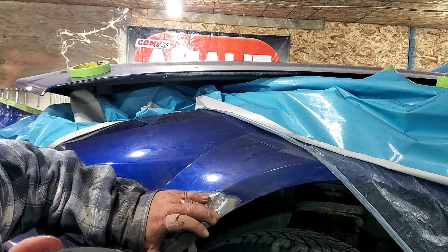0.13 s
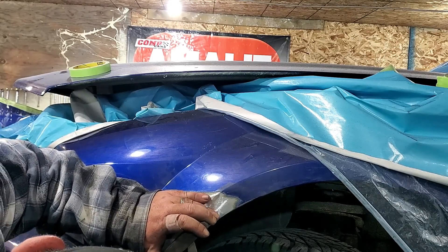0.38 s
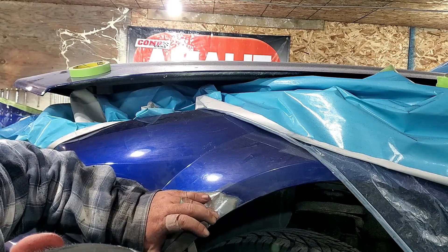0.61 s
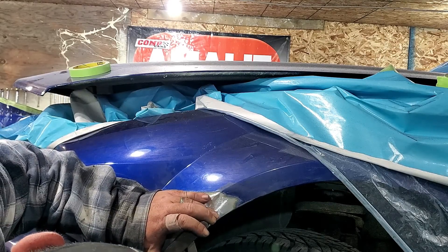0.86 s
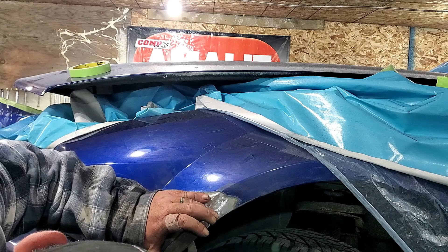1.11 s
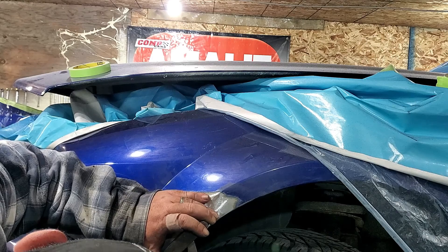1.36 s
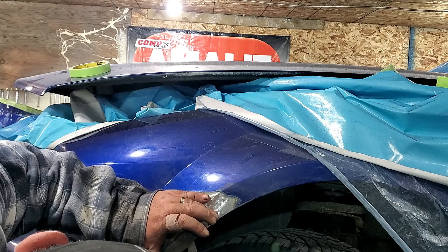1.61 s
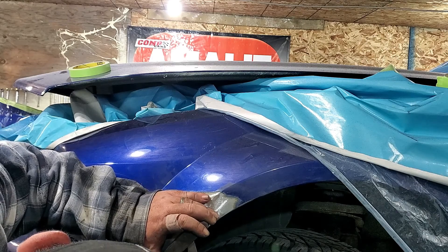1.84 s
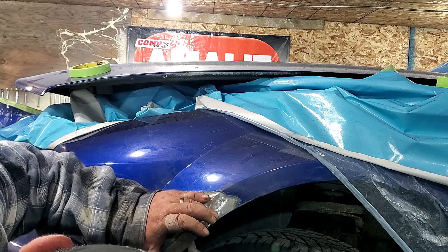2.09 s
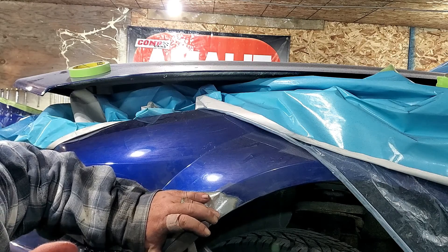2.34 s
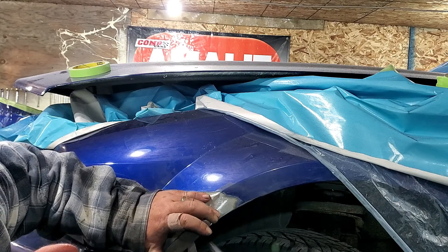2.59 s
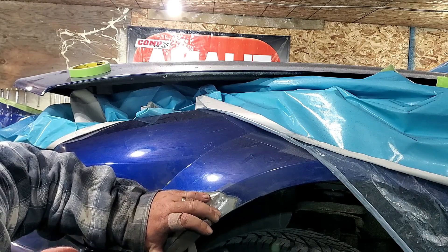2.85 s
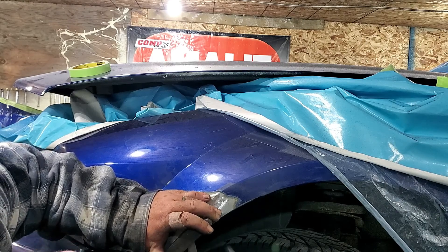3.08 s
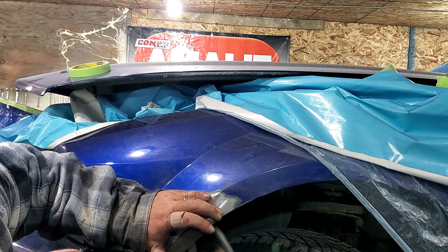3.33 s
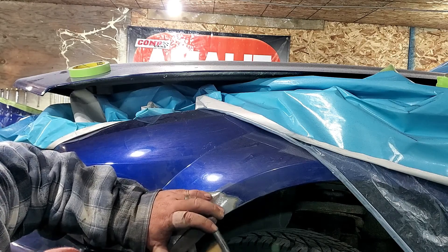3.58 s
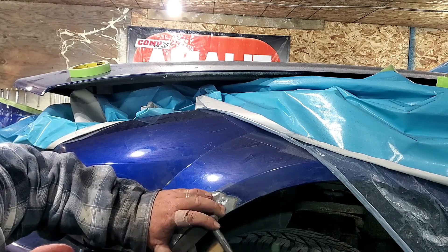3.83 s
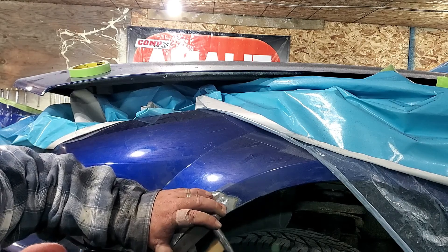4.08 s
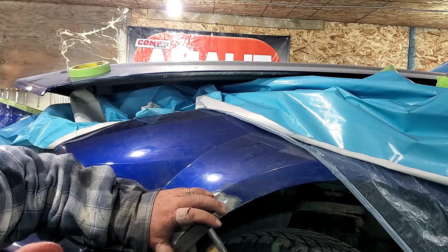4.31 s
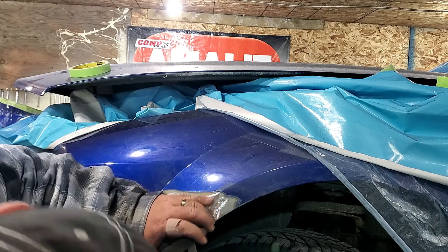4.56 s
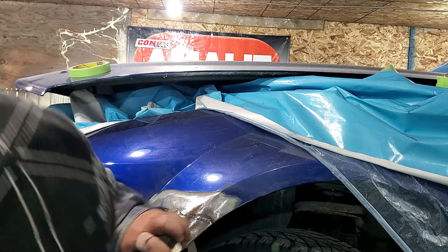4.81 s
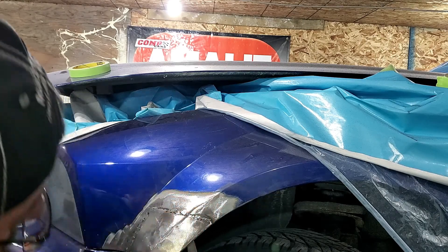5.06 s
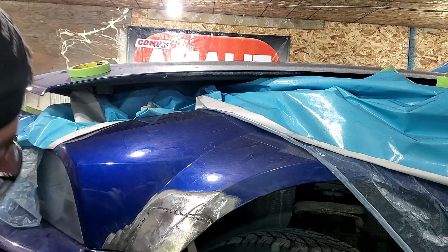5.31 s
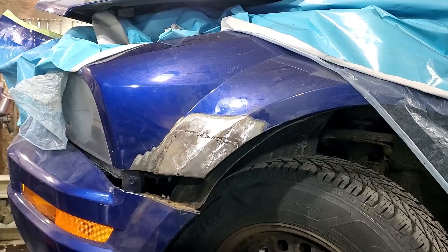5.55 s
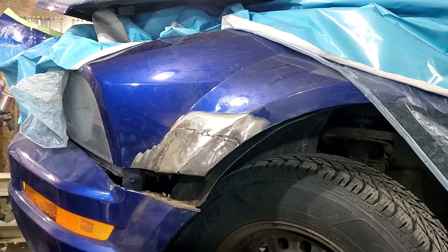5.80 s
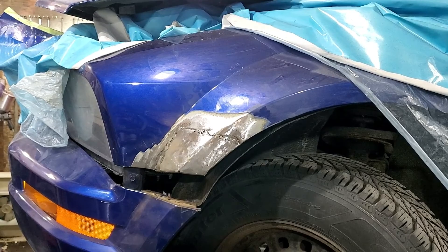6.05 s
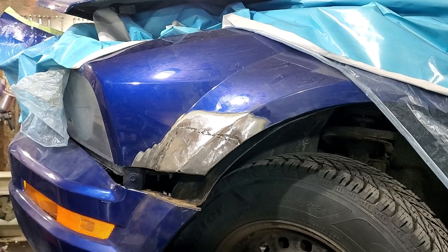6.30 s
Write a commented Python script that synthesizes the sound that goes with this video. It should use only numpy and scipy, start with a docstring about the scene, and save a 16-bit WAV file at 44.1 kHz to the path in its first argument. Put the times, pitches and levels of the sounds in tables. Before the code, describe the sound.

From 0 to about 4.4 seconds a hammer taps a steel car fender in a wooden garage, roughly four blows a second. The tail of an earlier blow opens the scene; hits land from 0.15 s, slightly uneven in strength and colour, with a much softer one at 3.64 s and the last at 4.34 s. Each is a sharp tick and solid clank around 300 to 1300 hertz, hand-damped, with low car-body boom, brief rattling tail and a very faint high ring from the hammer head. At 4.44 to 4.9 s the tool slides off in an uneven, gritty scrape with a faint squeal. Soft sleeve rustles and tiny dry fabric snaps follow until 5.3 s over quiet air and faint hum. At 5.4 s a cut brings low, wavering shop rumble, with a soft rush swelling at the very end. Close stereo camera microphones compress the blows.

```python
"""A hammer taps four times a second on a hand-damped steel fender in a wooden garage: the sheet, the car
body and the hammer head ring, over shop air and a faint hum. The blows stop and the tool slides off the panel
as filtered grains and grit; a sleeve rustles close by as shaped noise. A splice jumps to the quiet shop:
a low rumble, then a soft rush swells. Two spaced camera microphones ride their gain down on loud blows."""
import sys
import numpy as np
from scipy import signal
from scipy.fft import rfft, irfft
from scipy.io import wavfile
from scipy.ndimage import uniform_filter1d

SR = 44100
rng = np.random.default_rng(int(sys.argv[2]) if len(sys.argv) > 2 else 0)


def output_pcm(signal):
    """Save a mono or channel-first signal as 16-bit PCM at the path in sys.argv[1].

    Samples are clipped to [-1, 1] before scaling.
    """
    pcm = np.clip(np.atleast_2d(signal).T, -1, 1) * 32767
    wavfile.write(sys.argv[1], SR, np.round(pcm).astype(np.int16))


def voltage_ratio(level):
    """Linear amplitude factor for a level in decibels (scalar or array-like)."""
    return 10 ** (np.asarray(level, float) / 20)


N = 283122
LEAD = 8192   # samples kept ahead of the start, for the blow that falls there
SPLICE_S = 5.404


def rms_one(x):
    """Scale to unit rms."""
    return x / np.sqrt(np.mean(x ** 2) + 1e-20)


def at_hz(points, hz):
    """Read a table on a log-frequency axis."""
    points = np.array(points)
    return np.interp(np.log(hz), np.log(points[:, 0] + 1), points[:, 1])


def bands(shape, low_hz=25, high_hz=17000):
    """Third-octave bands of noise; neighbours are unrelated."""
    white = rng.standard_normal((2, *shape))
    edges = 25 * 2 ** np.arange(0, 9.7, 1 / 3)
    for k, (low, high) in enumerate(zip(edges, edges[1:])):
        if low_hz <= high and low <= high_hz:
            band = signal.butter(2, [low, high], "band", fs=SR, output="sos")
            yield np.sqrt(low * high), signal.sosfilt(band, white[k % 2])


# Likeness of the two spaced microphones: pitch_hz, left_right_correlation
LIKENESS = [(60, 0.96), (290, 0.93), (640, .6), (1400, 0.0024), (3000, -0.0041)]


def pair(hz, mid, side):
    """Two spaced microphones hear the bass alike and the treble apart."""
    alike = np.clip(at_hz(LIKENESS, hz), -1, 1)
    return np.sqrt(1 + alike) * mid + np.sqrt(1 - alike) * side * [[1], [-1]]


def noise(spectrum, start_s=0):
    """Steady stereo noise from a given moment on, rms 1 while it lasts."""
    first = int(start_s * SR)
    out = 0
    for hz, (mid, side) in bands((2, N - first), spectrum[0][0], spectrum[-1][0]):
        out = out + voltage_ratio(at_hz(spectrum, hz)) * pair(hz, mid, side)
    return np.pad(rms_one(out), ((0, 0), (first, 0)))


def waver(hz, width_hz):
    """A narrow band of noise around a pitch, which may move; rms 1."""
    lowpass = signal.butter(2, width_hz / 2, fs=SR, output="sos")
    slow = signal.sosfilt(lowpass, rng.standard_normal((2, N)))
    phase = 2 * np.pi * np.cumsum(hz + np.zeros(N)) / SR
    return rms_one(slow[0] * np.sin(phase) + slow[1] * np.cos(phase))


def flicker(rate_hz, depth_db):
    """Uneven gain of a chattering or slipping contact: slow noise in decibels, rms 1."""
    r = np.exp(-2 * np.pi * rate_hz / SR)
    slow = signal.lfilter([1], [1, -2 * r, r * r], rng.standard_normal(N))
    return rms_one(voltage_ratio(depth_db * rms_one(slow)))


def ringing(modes, gains, t, rise_cycles=1e-3):
    """Dying sines, one row per row of gains; each builds up over some cycles."""
    hz, db, t60 = np.transpose(modes)[:, :, None]
    rise = 1 - np.exp(-t * hz / rise_cycles)
    return gains @ (voltage_ratio(db - 60 * t / t60) * np.sin(2 * np.pi * hz * t) * rise)


def struck_anew(modes, gains, t, rise_cycles):
    """Each mode is a cluster of close partials, shifted and weighted anew at every blow."""
    cluster, detune_per_khz, spread_db = 3, 0.022, 2.5
    hz, db, t60 = np.repeat(modes, cluster, axis=0).T
    gains = np.repeat(gains, cluster, axis=1) / np.sqrt(cluster)
    spread = detune_per_khz * np.minimum(hz / 1000, 1)   # wider for high modes, up to 1 kHz
    rows = []
    for gain, (shift, weight) in zip(gains, rng.standard_normal((len(gains), 2, len(hz)))):
        partials = np.transpose([hz * (1 + spread * shift), db + spread_db * np.tanh(weight), t60])
        sign = np.repeat(np.sign(shift[::cluster]), cluster)
        rows.append(ringing(partials, gain * sign, t, rise_cycles))
    return np.array(rows)


# Blows on the fender: start_s, strength_db, bass_db, thump_db (near 300 Hz), clank_db (near 1.3 kHz),
# edge_db (near 3.3 kHz), sizzle_db, head_ring_db, hand_damping_db_per_s
BLOWS = [(-.1035, -10.5, 10.5, 6.5, 9, 7, 3, -50.5, 24), (0.1555, 4, 2.5, 1, 4, 3.5, 0, -61.5, 29.5),
         (0.4154, 6, 1.5, 0, 3, 1.5, 0, -77, 31.5), (0.6768, 7, -1, -1, 1.5, 0.5, 1.5, -69, 20),
         (0.9377, 3, 7.5, 3.5, 6, 4.5, 6, -73.5, 52.5), (1.1894, 11, -2.5, -1, 2.5, 0.5, 0.5, -55.5, 26),
         (1.4377, 8.5, -1.5, -3, 5, 2, 1.5, -56, 33), (1.6833, 7.5, -2, -5, 2, 3, 0, -59, 28),
         (1.9366, 7.5, -3, -3.5, 1.5, 1, -0.5, -69, 32.5), (2.183, 6.5, 0, 4, 1.5, -2.5, -1, -67.5, 77),
         (2.4256, 6.5, -2.5, -3, -1.5, -5, 0, -46.5, 36), (2.6773, 5.5, -5, -7, 3, -0.5, 1, -51, 18.5),
         (2.9427, 7.5, -6, -4.5, 2.5, 1.5, 0.5, -48.5, 19.5),
         (3.1978, 7, -2.5, -4.5, 2.5, 0.5, 0.5, -49.5, 27), (3.4241, 6.5, -5, -1.5, 4, 1, -0.5, -60, 21),
         (3.6412, -7.5, 6.5, 7, 10, 4, 10.5, -62, 49), (3.873, 4, -0.5, 1, 7, 1, 1, -65, 41),
         (4.108, 7, -4, 1, 7, 7, -4.5, -59, 30.5), (4.3397, 4, -3.5, -3, 2, 1.5, -1, -54, 29.5)]
# Where the colours of a blow sit: pitch_hz of bass, thump, knock, clank, edge, sizzle
COLOUR_HZ = [190, 300, 550, 1300, 3300, 11000]
# Modes of the fender sheet: pitch_hz, level_db, t60_s
FENDER = [(225.2, -1, 0.37), (295.1, 3.5, 0.3), (324, -6, 0.13), (370.2, 0, 0.34), (441, -0.5, 0.37),
          (500, -2, 0.24), (555.4, -2, 0.45), (630.5, -1, 0.28), (767, -5.5, 0.37), (804, -5, 0.33),
          (983, -6, 0.41), (1070, -4.5, 0.29), (1116, -9, 0.37), (1290, -4, 0.2), (1583, -8, 0.25),
          (1760, -8, 0.27), (3260, -11.5, 0.21)]
# Boom of the car body: pitch_hz, level_db, t60_s
SHELL = [(47.9, -7, 0.44), (78.6, 1, 0.33), (90.3, 1, 0.35), (95.9, 11.5, 0.17), (115.45, 3, 0.37),
         (156.3, 7.5, 0.25)]
# Crack of the dense sheet modes: pitch_hz, level_db (per Hz)
CLATTER = [(88, -35), (150, -4.5), (287, 0), (401, 1.5), (618, -3.5), (709, -8.5), (2220, -16), (3290, -18),
           (4870, -25.5), (9330, -31), (15500, -25), (16500, -43)]
# Decay of the crack: pitch_hz, t60_s
CLATTER_T60 = [(200, 0.039), (1000, 0.039), (5000, 0.01), (14000, 0.024)]
# Decay of rattle and reverberation: pitch_hz, t60_s
TAIL_T60 = [(150, 0.29), (300, 0.26), (1000, 0.33), (3000, 0.28), (8000, 0.23), (14000, 0.2)]


def hammer():
    """Each blow pushes the sheet, rings its modes, cracks, booms the body and leaves a diffuse tail."""
    blows = np.array(BLOWS)
    t = np.arange(SR // 2) / SR
    bass, thump, clank, edge, sizzle = blows[:, 2:7].T
    shade = np.transpose([bass, thump, 0 * bass, clank, edge, sizzle])   # the knock follows strength alone

    def colour(hz):
        """Where the blow lands sets its colour: gains, blows x frequencies."""
        return voltage_ratio([np.interp(np.log(hz), np.log(COLOUR_HZ), row) for row in shade])

    grip_db = blows[:, 8:] * t
    sheet = struck_anew(FENDER, colour(np.array(FENDER)[:, 0]), t, rise_cycles=4.4)
    sheet = voltage_ratio(-17.0 - grip_db - 280 * t ** 2) * sheet   # the hand damps the ring ever more

    late = np.maximum(t - 0.00079, 0)   # the sheet gives way just after the first tick
    push_modes = [(319, 17.3, 0.0075), (564.4, 25.7, 0.0055), (880, 14.6, 0.0059), (1344, 5.9, .007)]
    push = ringing(push_modes, colour(np.array([297.2, 475.0, 850, 1300])), late)
    push = push * (1 - np.exp(-(late / 0.0026) ** 2))
    push[:, 146:] += voltage_ratio(-6.0) * push[:, :-146]   # first reflection, 3.3 ms late

    boom = voltage_ratio(-27.0) * ringing(SHELL, colour(np.array(SHELL)[:, 0]), t)
    boom = boom * (1 - np.exp(-(t / 0.019) ** 2))   # builds up slowly

    crack, tail = 0, 0
    long = t[:int(.36 * SR)]
    for hz, (mid, side) in bands((2, len(blows), len(long)), 130):
        gain = voltage_ratio(at_hz(CLATTER, hz)) * colour(hz)[:, None]
        clatter = voltage_ratio(-60 * long / at_hz(CLATTER_T60, hz))
        tick = voltage_ratio(4.4 * np.log2(hz / 9000) - 1 - 60 * long / 0.0049)   # brief and bright
        crack = crack + gain * (clatter + tick) * mid
        # countless sheet modes and reflections: never the same for two blows
        decay = voltage_ratio(-60 * long / at_hz(TAIL_T60, hz)) * (1 - np.exp(-long / (0.0084 + 3.6 / hz)))
        # the noise runs backwards here, so the tail does not copy the crack
        tail = tail + gain[:, None] * decay * pair(hz, mid[:, None, ::-1], side[:, None])

    direct = sheet + push
    direct[:, :len(long)] += voltage_ratio(13.0) * crack * (1 - np.exp(-long / 0.0011))
    thin = signal.butter(2, 170.0, "high", fs=SR, output="sos")   # a thin sheet radiates little bass
    direct = signal.sosfilt(thin, direct) + boom
    # the loose patch chatters in the tail
    starts = rng.integers(0, N - len(long), len(blows))
    chatter = flicker(119.3, depth_db=1.5)[starts[:, None] + np.arange(len(long))]
    tail = (voltage_ratio(11.5 - grip_db[:, :len(long)]) * chatter)[:, None] * tail

    out = np.zeros((3, LEAD + N + len(t)))   # direct sound, then left and right tail
    for row, near, diffuse in zip(blows, direct, tail):
        i = LEAD + round(row[0] * SR)
        out[0, i:i + len(t)] += voltage_ratio(row[1]) * near
        out[1:, i:i + len(long)] += voltage_ratio(row[1]) * diffuse
    return out[0, :LEAD + N], out[1:, LEAD:LEAD + N]


# Decay of the wooden garage: pitch_hz, t60_s
ROOM_T60 = [(60, 0.37), (300, 0.22), (1000, 0.22), (3000, 0.29), (8000, 0.18), (14000, 0.16)]


def garage(x):
    """Direct sound, a little late on the left, and one fixed diffuse tail that dies band by band."""
    t = np.arange(int(.6 * SR)) / SR
    tail = 0
    for hz, (mid, side) in bands((2, len(t))):
        tail = tail + pair(hz, mid, side) * voltage_ratio(-60 * t / at_hz(ROOM_T60, hz))
    echo = voltage_ratio(-35.0) * tail * (1 - np.exp(-t / 0.002))
    echo[0, 11] += 1   # left microphone, 11 samples late
    echo[1, 0] += 1
    return signal.fftconvolve(x[None], echo, axes=1)[:, :len(x)]


def hammer_head():
    """The hardened head sings on; each blow stops and restarts it, and laying the tool down damps it."""
    head_hz, t60_s, laid_s = 4500, 1.7, 4.7
    s, ring_db = np.array(BLOWS)[:, 0], np.array(BLOWS)[:, 7]
    t = np.arange(N) / SR
    k = np.searchsorted(s, t) - 1   # latest blow
    level_db = ring_db[k] - 60 * (t - s[k]) / t60_s - 60 * np.maximum(t - laid_s, 0)
    return voltage_ratio(level_db) * np.sin(2 * np.pi * head_hz * t - [[.8], [0]])


def after_splice():
    """Crossfade of 8 ms that ends at the splice: 0 before, 1 after."""
    return np.clip((np.arange(N) / SR - SPLICE_S) * 125 + 1, 0, 1)


# Shop air before the splice: pitch_hz, level_db (per Hz, relative)
AIR = [(18, -34.5), (45, 6), (85, 4.5), (404, -17), (476, -4), (527, -15), (1040, -14), (1150, -23.5),
       (4000, -31.5), (5200, -56)]


def shop_air():
    """Quiet air, steady coloured noise, until the splice."""
    return (1 - after_splice()) * voltage_ratio(-64) * noise(AIR)


# Faint wavering hum: start_s, pitch_hz, level_db
HUM = [(0, 490, -56), (5.39, 492.8, -77.5), (5.4, 517.5, -83), (6.2, 517, -69.5)]


def hum():
    """A faint tone, a narrow band of noise, that drifts in pitch and level."""
    s, hz, db = np.transpose(HUM)
    t = np.arange(N) / SR
    return voltage_ratio(np.interp(t, s, db)) * waver(np.interp(t, s, hz), width_hz=32)


# Tool dragged off, level in the panel: start_s, level_db
SLIDE = [(4.44, -25), (4.488, -43), (4.59, -38.5), (4.63, -33), (4.664, -27), (4.68, -45), (4.712, -31.5),
         (4.725, -55), (4.775, -44.5), (4.79, -58), (4.86, -63)]
# Colour of the grit: pitch_hz, level_db (per Hz, relative)
GRIT = [(410, -33), (700, -4), (1360, -4), (1610, -15), (1860, -5), (2960, -12.5), (15000, -31.5),
        (15900, -27), (16500, -58)]


def slide():
    """Dense uneven grains of steel on steel ring the damped sheet; the rest is grit with a faint squeal."""
    grit_start_s, lift_s = 4.44, 4.668   # the grit swells until the tool lifts
    grit_db, rise_db_per_s, grit_t60_s = -36, 31, 0.24
    time = np.arange(N) / SR
    s, db = np.transpose(SLIDE)
    s = np.r_[s[0] - .008, s, s[-1] + .008]   # fades in and out within 8 ms
    panel = np.interp(time, s, np.r_[0, voltage_ratio(db), 0])

    grains = rng.standard_normal(N) * voltage_ratio(2.7 * rng.exponential(1, N)) * flicker(43.0, depth_db=4.0)
    t = np.arange(SR // 8) / SR
    near = voltage_ratio(-26.0 * np.abs(np.log2(np.array(FENDER)[:, 0] / 490)))   # mostly the modes near 500 Hz
    damped = [(hz, db, 0.24 * t60) for hz, db, t60 in FENDER]
    body = ringing(damped, near, t) * (1 - np.exp(-t / 0.00047))
    body += voltage_ratio(-31.5) * ringing(SHELL, np.array(SHELL)[:, 0] / 100, t)   # the car body rumbles along
    scrape = panel * rms_one(signal.fftconvolve(grains, body)[:N])

    since = time - lift_s
    swell = voltage_ratio(grit_db + np.minimum(rise_db_per_s * since, -60 * since / grit_t60_s))
    swell = swell * (since > grit_start_s - lift_s)
    squeal = voltage_ratio(-10.5) * waver(1650, width_hz=50)
    grit = swell * flicker(35.0, depth_db=1.5) * (noise(GRIT, start_s=4.4) + squeal)
    return scrape, grit


# Colour of the crisp cloth: pitch_hz, level_db (per Hz, relative)
RUSTLE_TONE = [(2350, -32), (4000, -7), (9850, -7), (14500, 0), (16200, -7), (16500, -33)]
# Fabric snaps: start_s, level_db
TICKS = [(4.959, -53), (4.976, -57), (5.246, -55), (5.295, -58)]
# Sleeve strokes, each peaking at its start_s: start_s, length_s, crisp_db, dull_db
BRUSHES = [(4.748, 0.11, -78, -59), (4.875, 0.069, -69.5, -69.5), (4.954, 0.04, -65, -66),
           (5.11, 0.028, -79, -78)]


def sleeve():
    """Cloth brushing close by: strokes that swell and fade over a faint rustle, with a few dry snaps."""
    t = np.arange(N) / SR
    s, length, crisp_db, dull_db = np.transpose(BRUSHES)[:, :, None]
    stroke = np.exp(np.minimum((t - s) / (.3 * length), (s - t) / length))   # swells faster than it fades
    crisp = (voltage_ratio(crisp_db) * stroke).sum(axis=0) + voltage_ratio(-77) * (t < SPLICE_S)   # faint steady rustle
    dull = (voltage_ratio(dull_db) * stroke).sum(axis=0)
    snaps = np.zeros(N)
    for start_s, level_db in TICKS:
        snaps[round(start_s * SR)] = voltage_ratio(level_db)
    snaps = signal.lfilter([1], [1, -np.exp(-1 / (0.0015 * SR))], snaps)   # die over 1.5 ms
    dull_tone = [(700, -7.0), (1200, 1.0), (4500, -12.0), (6000, -35)]
    return (crisp + snaps) * noise(RUSTLE_TONE, start_s=4.6) + dull * noise(dull_tone, start_s=4.6)


# Shop after the splice: pitch_hz, level_db (per Hz, relative)
RUMBLE = [(15, -36), (25, -2), (59, 2.5), (99, -1.5), (130, -3), (166, -34), (206, -2), (285, -38),
          (363, -25.5), (405, -30), (531, -28), (695, -33), (988, -38), (2350, -49.5), (16000, -71)]
# Wavering tones in the rumble: pitch_hz, level_db (relative)
DRONE = [(60, -0.5), (128, -4), (205, -13.5)]


def shop_rumble():
    """After the splice a rumble with wavering tones, slowly rising air and a soft rush that swells last."""
    t = np.arange(N) / SR
    low = noise([p for p in RUMBLE if p[0] < 330] + [(400, -60)], start_s=5.4)
    low = voltage_ratio(-0.5) * low
    for hz, db in DRONE:
        low = low + voltage_ratio(db) * waver(hz, width_hz=16.0)
    air = noise([(280, -60)] + [p for p in RUMBLE if p[0] >= 330], start_s=5.3)
    air_gain = voltage_ratio(-70 + 3.5 * (t - SPLICE_S))   # dB per second
    rush = noise([(500, -18), (800, 1.0), (1700, -2), (3500, -32)], start_s=3.5)
    rush_gain = voltage_ratio(-80) + voltage_ratio(-64 + 85 * (t - 6.43))   # steady part, plus a swell in dB per second
    after = voltage_ratio(-53) * low + air_gain * air + rush_gain * rush
    after[1] = np.roll(after[1], 8)   # late on the right: these sounds come from the left
    return after_splice() * after


def scene():
    """Hammer and slide in the garage, sleeve close by, shop air around."""
    struck, tail = hammer()
    scrape, grit = slide()
    struck[LEAD:] += scrape
    in_garage = garage(struck)[:, LEAD:] + tail + hammer_head() + grit
    return in_garage + sleeve() + shop_air() + hum() + shop_rumble()


def low_pass(x):
    """Removes everything above the highest recorded frequency."""
    return signal.sosfilt(signal.butter(12, 16990, fs=SR, output="sos"), x)


# Microphone balance: pitch_hz, level_db (left minus right)
BALANCE_DB = [(60, 0), (700, .5), (2400, 0.5), (8000, -1), (15000, 4)]


def record(dry):
    """The camera's microphones differ by band; a compressor ducks loud blows and lets go over the tail."""
    hz = np.fft.rfftfreq(N, 1 / SR) + 1
    balance = voltage_ratio(at_hz(BALANCE_DB, hz) * np.array([[.5], [-.5]]))
    x = irfft(rfft(dry) * balance, N)
    x = signal.sosfilt(signal.ellip(10, .5, 55, 15750, fs=SR, output="sos"), x)   # treble cut
    x = x + voltage_ratio(-89.5) * rng.standard_normal(x.shape)   # microphone hiss

    level_db = 10 * np.log10(uniform_filter1d(np.mean(x ** 2, axis=0), size=128).clip(1e-12))
    fall = 110 * np.arange(N) / SR   # release, dB per second
    held_db = np.maximum.accumulate(level_db + fall) - fall
    over_db = np.maximum(held_db + 21.5, 0)   # threshold -21.5 dB
    r = np.exp(-1 / (0.0035 * SR))   # attack in s, slow enough to let the first swing through
    x = x * voltage_ratio(-.6 * signal.lfilter([1 - r], [1, -r], over_db))

    x = 0.92 * np.tanh(x / 0.89)   # soft overload
    mix = signal.sosfilt(signal.butter(6, 36.0, "high", fs=SR, output="sos"), x)   # bass cut
    return low_pass(mix)


dry = scene()
out = record(dry)
output_pcm(out)
```